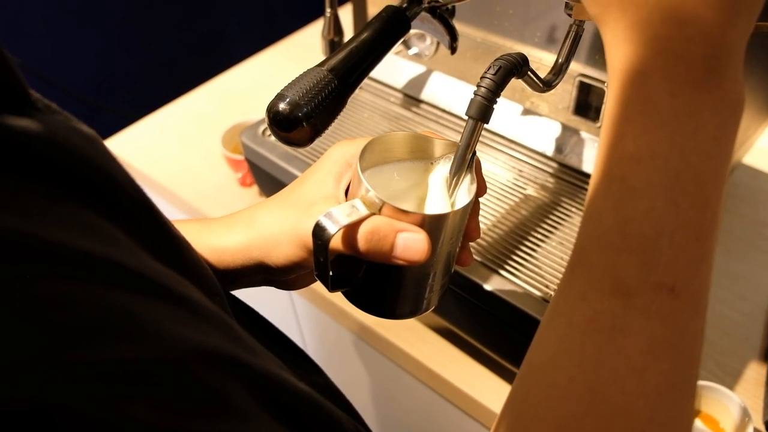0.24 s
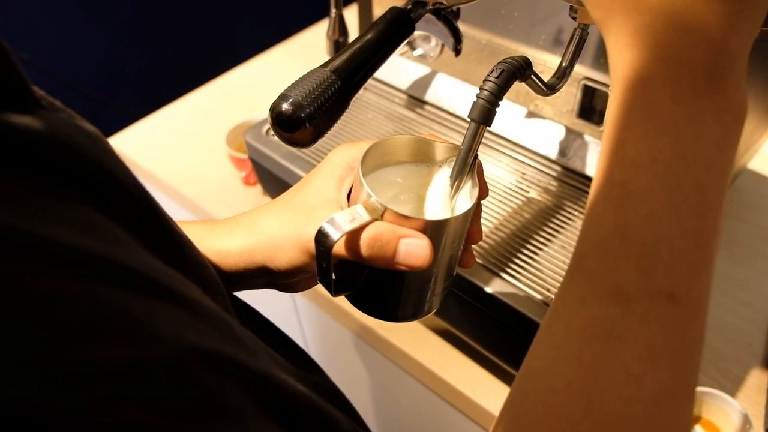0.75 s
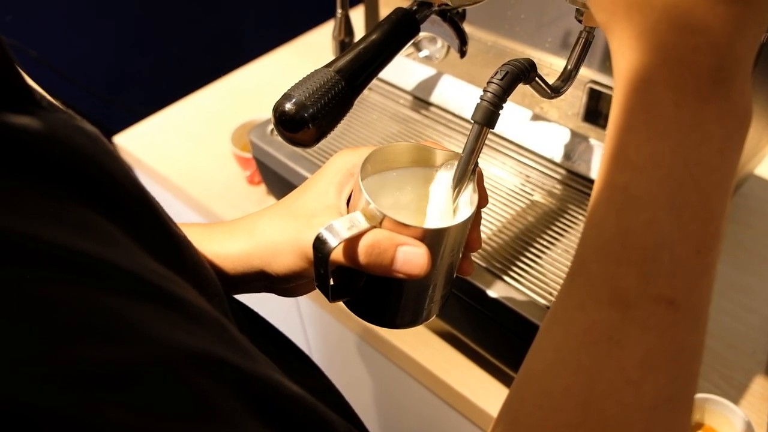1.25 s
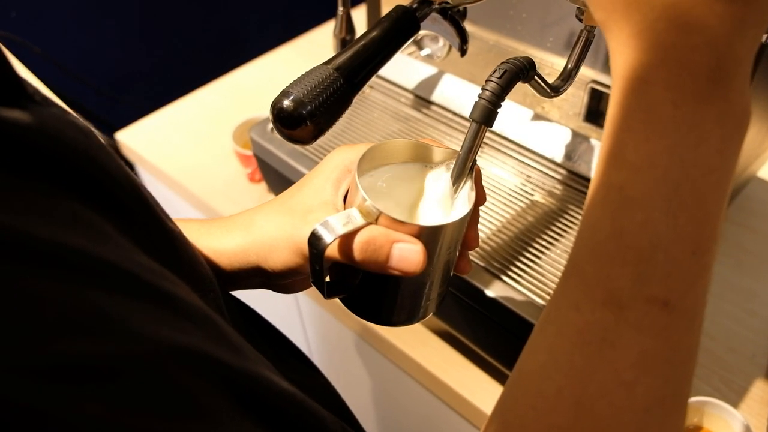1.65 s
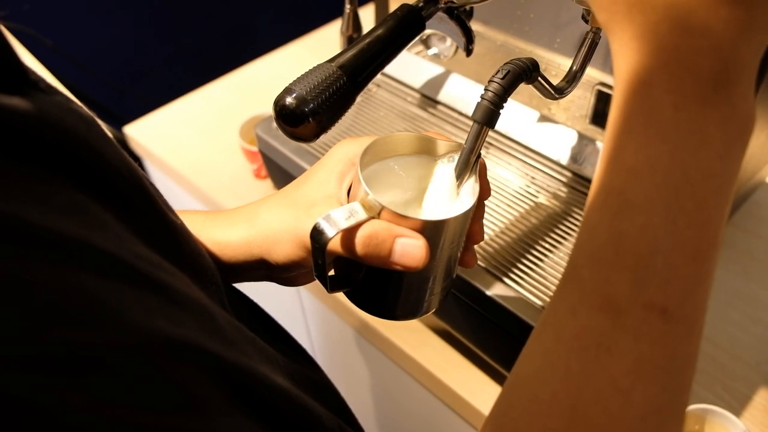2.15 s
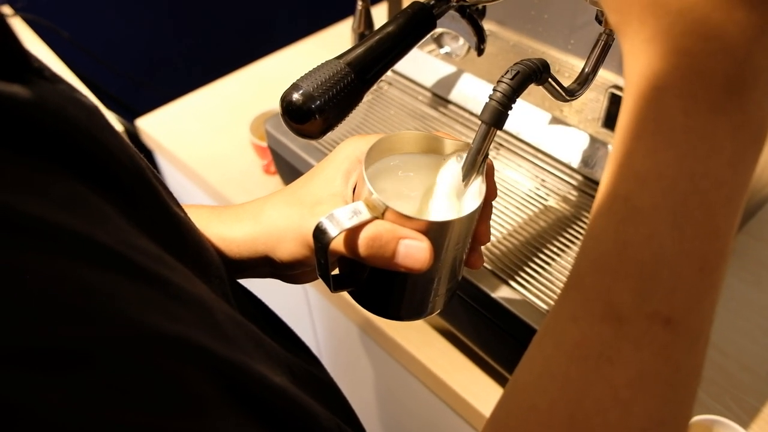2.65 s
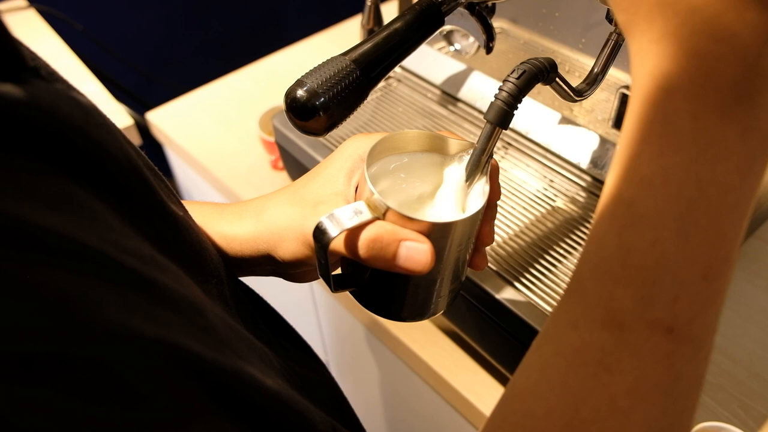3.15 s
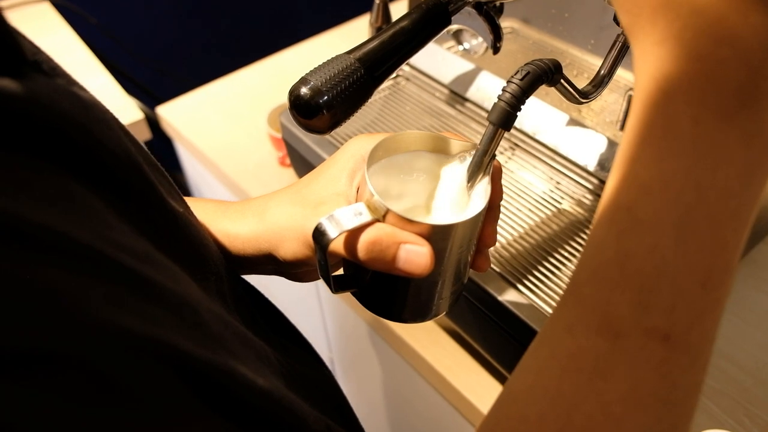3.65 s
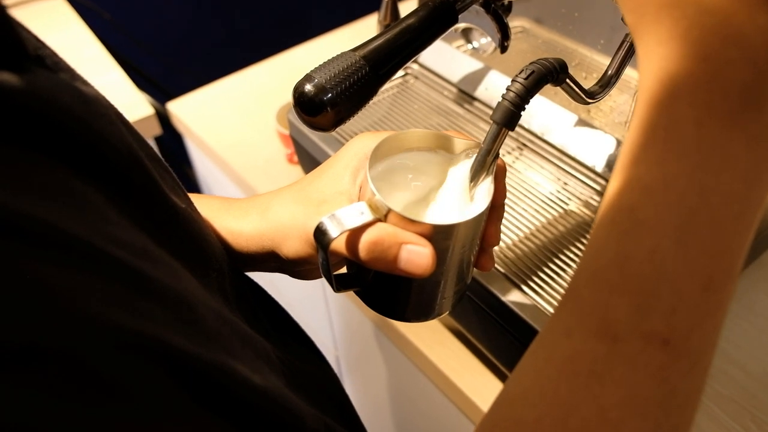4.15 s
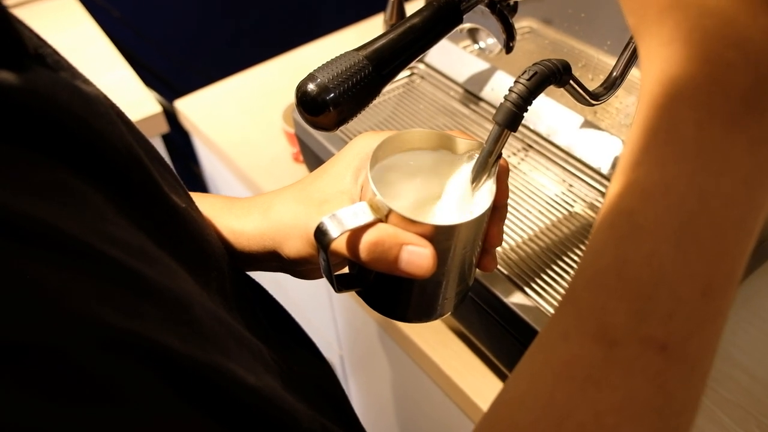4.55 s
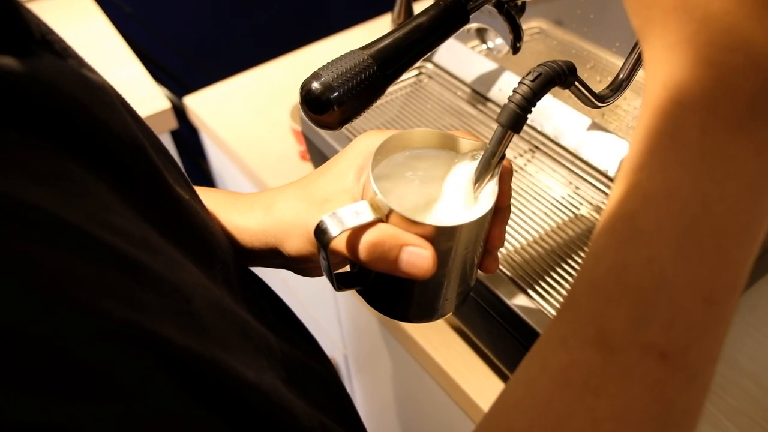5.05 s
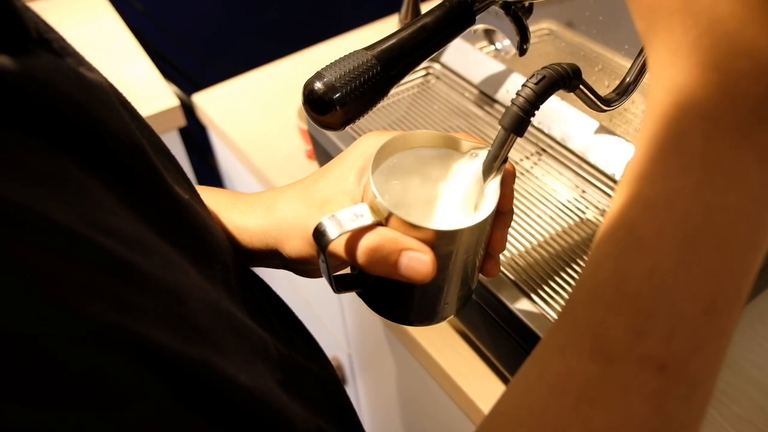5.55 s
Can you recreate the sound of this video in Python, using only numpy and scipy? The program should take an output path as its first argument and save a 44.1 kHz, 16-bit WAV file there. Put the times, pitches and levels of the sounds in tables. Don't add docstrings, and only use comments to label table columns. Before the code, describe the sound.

A steam jet spits and slurps at the surface of milk, gulps under, then roars steadily with a metallic ring that thickens toward the end.

```python
import sys
import numpy as np
from scipy import signal
from scipy.fft import rfft, irfft
from scipy.io import wavfile
from scipy.ndimage import uniform_filter1d

SR = 44100
rng = np.random.default_rng(int(sys.argv[2]) if len(sys.argv) > 2 else 0)


def dump_mix(stems):
    frames = np.atleast_2d(stems).T
    limited = np.clip(frames, -1, 1)
    pcm = np.round(limited * 32767).astype(np.int16)
    wavfile.write(sys.argv[1], SR, pcm)


def magnitude_from_level(level_db):
    exponent = np.asarray(level_db, float) / 20
    return 10 ** exponent


N = 255780


def evened(x):
    return x / np.sqrt(np.mean(x ** 2) + 1e-20)


def read(points, hz):
    f, value = np.transpose(points)
    return np.interp(np.log(hz + 1), np.log(f + 1), value)


def lifts(modes, hz):
    return sum(db / (1 + (2 * (hz - f) / width) ** 2) for f, width, db in modes)


def window(hz, low_hz, high_hz, order=30):
    return 1 / (1 + (low_hz / (hz + 1)) ** order) / (1 + (hz / high_hz) ** order)


def add(mix, s, sound):
    part = mix[round(max(s, 0) * SR):][:len(sound)]
    part += sound[:len(part)]


def crackle(per_s, spread_db, share):
    happens = rng.random(N) < per_s / SR
    size = magnitude_from_level(spread_db * np.minimum(rng.exponential(1, N), 3)) * happens
    collapses = evened(size * rng.choice([-1., 1.], N))
    share = np.clip(share, 0, 1)
    return np.sqrt(share) * collapses + np.sqrt(1 - share) * rng.standard_normal(N)


def shaped(drive, field_db, size, patchy_db, flicker_db):
    hz, t, z = signal.stft(drive, SR, nperseg=size, noverlap=size * 3 // 4)
    patches = rng.standard_normal(z.shape[::-1]).T
    patches = uniform_filter1d(patches, size=size // 100, axis=0)
    patches = evened(uniform_filter1d(patches, size=9, axis=1))
    flicker = evened(uniform_filter1d(rng.standard_normal(len(t)), size=4))
    z = z * magnitude_from_level(field_db(hz[:, None], t) + patchy_db * patches + flicker_db * flicker)
    return signal.istft(z, nperseg=size, noverlap=size * 3 // 4)[1][:N]


def glides(rows, waver, waver_s):
    out = np.zeros(N)
    for start_s, end_s, start_hz, end_hz, db in rows:
        count = round(max(end_s - start_s, .005) * SR)
        noise = rng.standard_normal((2, SR))
        drift, swell = (evened(uniform_filter1d(v, round(waver_s * SR))) for v in noise)
        hz = np.linspace(start_hz, end_hz, count) * (1 + waver * drift[:count])
        phase = 2 * np.pi * np.cumsum(hz) / SR
        tone = np.sqrt(2) * np.sin(phase) * magnitude_from_level(db + 1.9 * swell[:count])
        add(out, start_s, tone * signal.windows.tukey(count, .4))
    return out


# t/s, steam power level/dB, depth of the tip/0-1
JET_COURSE = [(0, -24.5, 0.09), (.29, -26, 0), (.58, -25.5, 0.1), (.87, -25.5, 0.07), (1.03, -21, 0.45),
              (1.35, -23, 0.09), (1.9, -23.3, 0.52), (2.3, -22, 0.68), (2.6, -23.5, 0.68), (3.05, -22, 0.7),
              (3.45, -21.5, 0.91), (3.62, -19, 1), (3.91, -21.5, 0.78), (4.1, -19.5, 0.79),
              (4.5, -18, 0.69), (5.07, -17.5, 0.57), (5.3, -18, 0.41), (5.8, -17.5, 0.18)]


def jet_at(t):
    s, power_db, depth = np.transpose(JET_COURSE)
    return np.interp(t, s, power_db), np.interp(t, s, depth)


def answer(parts, hz, t):
    power_db, depth = jet_at(t)
    controls = [c - c.mean() for c in (power_db, depth, t)]
    return sum(window(hz, low_hz, high_hz) * np.dot(laws, controls) for low_hz, high_hz, *laws in parts)


# f/Hz, reverberation time/s
ROOM_DECAY = [(400, 0.99), (2000, 0.44), (5000, 0.46), (10000, 0.33), (15000, 0.28)]


def room(x):
    taps = np.zeros((3, SR // 2))
    starts = np.arange(150, SR // 2 - 12, 12)
    at = starts + rng.integers(0, 12, (3, len(starts)))
    np.put_along_axis(taps, at, rng.choice([-1., 1.], at.shape), 1)
    hz, t, z = signal.stft(taps, SR, nperseg=256)
    decay = magnitude_from_level(-60 * t / read(ROOM_DECAY, hz)[:, None])
    tails = signal.istft(z * decay, SR, nperseg=256)[1]
    cycles = .7 * np.arange(N) / SR + np.arange(3)[:, None] / 3
    turns = np.cos(2 * np.pi * cycles) * np.sqrt(2 / 3)
    return signal.fftconvolve(x * turns, tails / np.linalg.norm(tails[0]), axes=1)[:, :N].sum(0)


# f/Hz, level/dB per Hz
RUMBLE_SPECTRUM = [(8.8, -31.5), (15, -5), (38, 5.5), (86, 1.5), (125, -1.5), (231, -6.5), (266, -15.5),
                   (329, -12), (390, -17), (450, -13.5), (580, -32), (990, -120)]


def rumble():
    low = shaped(rng.standard_normal(N), lambda hz, t: read(RUMBLE_SPECTRUM, hz) + 0 * t,
                 size=4096, patchy_db=.3, flicker_db=.2)
    return magnitude_from_level(-36.5) * evened(low)


# f/Hz, width/Hz, level/dB
MAINS_HUM = (99, 3, -43)


def hum():
    hz, width, db = MAINS_HUM
    r = np.exp(-np.pi * width / SR)
    waver = evened(signal.lfilter([1], [1, -r], rng.standard_normal(N)))
    return magnitude_from_level(db) * (1 + .5 * waver) * np.sin(2 * np.pi * hz * np.arange(N) / SR)


def ducking():
    power_db, _ = jet_at(np.arange(N) / SR)
    loud_db = uniform_filter1d(power_db, size=SR // 2)
    knee_db, share = -22.5, 0.7
    return magnitude_from_level(-share * np.maximum(loud_db - knee_db, 0))


# start t/s, end t/s, start f/Hz, end f/Hz, level/dB
ENGINE_GLIDES = [(.12, .46, 240, 230, -47.5), (.72, 1.3, 162, 177, -43), (.85, 1.08, 340, 310, -49.5),
                 (1.75, 2.3, 233, 238, -49), (2.95, 3.75, 310, 334.7, -53.5), (3.4, 4.1, 217, 231, -50.5),
                 (.8, 1.3, 224, 290, -53), (2.5, 3.4, 238, 247, -53), (1.3, 2.3, 130, 170, -50.5),
                 (2.0, 2.67, 170, 160, -52)]


def engines():
    return glides(ENGINE_GLIDES, waver=0.0078, waver_s=0.099)


# t/s, peak level/dB, f/Hz
KNOCKS = [
    (2.94, -25, 70),
    (3.023, -18, 65),
    (3.121, -24, 69.6),
    (3.182, -21, 49.6),
    (3.83, -20, 75),
    (.33, -30, 55),
]


def thumps():
    out, t = np.zeros(N), np.arange(5000) / SR
    for s, db, hz in KNOCKS:
        swell = (t / 0.015) * np.exp(1 - t / 0.0073)
        add(out, s, -magnitude_from_level(db) * np.sin(2 * np.pi * hz * t) * swell)
    return out


# t/s, peak level/dB, f/Hz
VALVE_TICKS = [
    (4.585, -36, 10900),
    (4.616, -54, 11700),
]


def ticks():
    out, t = np.zeros(N), np.arange(400) / SR
    for s, db, hz in VALVE_TICKS:
        rings = sum(np.sin(2 * np.pi * hz * k * t) for k in (.93, 1, 1.08, 1.3))
        add(out, s, magnitude_from_level(db - 60 * t / .008) * rings / 2)
    return out


# start t/s, end t/s, start f/Hz, end f/Hz, level/dB
VALVE_SQUEAKS = [(4.775, 4.795, 14200, 15200, -73), (4.8, 4.83, 13700, 14700, -82),
                 (4.803, 4.82, 14300, 14800, -61), (4.812, 4.84, 12850, 13500, -61),
                 (4.955, 4.99, 13100, 11950, -62), (4.99, 5.07, 12200, 11100, -60),
                 (4.975, 5.03, 15150, 14150, -60), (5.03, 5.055, 14600, 13900, -67),
                 (5.05, 5.095, 14150, 12900, -60)]


def squeaks():
    return glides(VALVE_SQUEAKS, waver=.004, waver_s=.004)


# t/s, level/dB, f/Hz, decay
# time to -60 dB/s
GULP_BUBBLES = [(1.556, -19, 830, 0.032), (1.557, -24.5, 580, 0.028), (1.6, -23, 1190, .03),
                (1.605, -20.5, 857, 0.047), (1.606, -24.5, 487, 0.052), (1.636, -20.5, 850, 0.03),
                (1.67, -38, 870, 0.035), (1.549, -15, 1800, .04), (1.699, -6.5, 1860, 0.052),
                (1.724, -11, 1850, 0.044), (2.522, -10.5, 1860, 0.035), (4.08, -6.5, 1875, .06),
                (4.946, -9, 1830, .04)]


def gulps():
    out, t = np.zeros(N), np.arange(6000) / SR
    for s, db, hz, t60 in GULP_BUBBLES:
        ring = np.sin(2 * np.pi * hz * t * (1 + 2.8 * t))
        add(out, s, magnitude_from_level(db - 60 * t / t60) * ring * np.minimum(t / 0.0018, 1))
    return out


# f/Hz, level/dB per Hz
TEAR_SPECTRUM = [(1760, -12), (3000, -4), (4180, -18.5), (4660, 5), (5060, -8), (5890, -6), (7400, -11.5),
                 (9680, -8), (10600, -14.5), (14300, -19), (15600, -36)]
# f/Hz, width/Hz, lift level/dB
MOUTH_MODES = [(3330, 170, -6), (3833, 250, 8.5), (4670, 200, 2), (5330, 120, 6.5), (5830, 340, 9.5),
               (6530, 130, 7.5), (9240, 250, -1), (9680, 510, 6), (11100, 250, 4), (12500, 500, 5),
               (13900, 550, 1)]
# t/s, length/s, body level/dB, brightness level/dB
AIR_DRAWS = [(0, 0.0083, -29.5, -19), (0.007, .02, -32, -13), (0.028, 0.014, -27.5, -10.5),
             (0.053, 0.048, -34, -26), (.109, .036, -30, -18), (0.143, 0.018, -20.5, -3),
             (0.165, 0.024, -22.5, -17), (0.197, 0.033, -25.5, -21), (0.222, 0.048, -27, -33),
             (.29, 0.57, -40, -20), (5.47, 0.035, -44, -16),
             (.893, 0.039, -36.5, -22), (.93, 0.027, -32.5, -16.5), (.971, 0.038, -31.5, -11.5),
                  (1.015, 0.023, -36.5, -17), (1.04, 0.029, -28, -15), (1.063, .011, -16, -15),
                  (1.073, 0.036, -23.5, -9), (1.11, 0.028, -19.5, -8.5), (1.142, .013, -21, -3.5),
                  (1.172, .024, -20.5, -5.5), (1.192, 0.021, -17.5, -9), (1.218, 0.015, -18, -7.5),
                  (1.236, .024, -18.5, -18), (1.27, 0.01, -16, -6.5), (1.284, 0.03, -19.5, -6),
                  (1.315, 0.011, -23.5, 2.5), (1.325, 0.028, -19, -9), (1.358, .014, -32, -2),
                  (1.393, 0.011, -23.5, -1.5), (1.427, 0.016, -21.5, -11.5), (1.438, 0.018, -22.5, -12),
                  (1.455, 0.017, -19, -10), (1.481, .014, -19, -6), (1.495, 0.016, -19, -6),
                  (1.514, 0.015, -19, -5.5), (1.534, 0.0092, -17.5, -17)]


def slurps():
    def field_db(hz, t):
        low_cut_db = 40 * window(hz, 1, 1500, order=8)
        return read(TEAR_SPECTRUM, hz) + lifts(MOUTH_MODES, hz) - low_cut_db + 0 * t

    drive = crackle(per_s=2500, spread_db=2.7, share=0.24)
    jet = rfft(shaped(drive, field_db, size=256, patchy_db=2.5, flicker_db=0.3))
    hz = np.fft.rfftfreq(N, 1 / SR)
    whistle = irfft(jet * window(hz, 8200, 10700), N)
    top = irfft(jet * window(hz, 10800, 30000), N)
    body = irfft(jet, N) - whistle - top
    power = np.zeros((3, N))
    for s, length, body_db, bright_db in AIR_DRAWS:
        levels = body_db, body_db + bright_db, body_db + 1.35 * bright_db - 1
        count = round(max(length, .003) * SR) + 260
        gate = signal.windows.tukey(count, min(520 / count, 1))
        for row, db in zip(power, levels):
            add(row, s - .003, magnitude_from_level(2 * db) * gate)
    sputter_per_s, sputter_db = 160, 2.2
    stutter = evened(uniform_filter1d(rng.standard_normal(N), size=SR // sputter_per_s))
    strength = np.sqrt(power) * magnitude_from_level(sputter_db * stutter - 1.0)
    return (strength * [evened(body), evened(whistle), evened(top)]).sum(0)


# f/Hz, level/dB per Hz
FIZZ_SPECTRUM = [(2200, -28), (3100, -9.5), (3600, -7), (4600, -7), (5150, -5.5), (5400, -11),
                 (6100, -11.5), (6550, -15), (7500, -17), (7700, -20.5), (10500, -26), (10850, -27.5),
                 (14400, -32), (15600, -36)]
# f/Hz, width/Hz, lift level/dB
RIM_MODES = [(3860, 170, 5), (4810, 170, 7.5), (5470, 70, 3), (6270, 190, 7.5), (7330, 200, 5.5),
             (8250, 200, 3), (9750, 350, 4.5), (10400, 250, 4)]
# low f/Hz, high f/Hz, share of power, level/dB at full depth, warming/dB per s
FIZZ_ANSWER = [(3100, 4060, 0.42, .3, 0.8), (3600, 5600, .05, 2, -0.82), (5040, 7500, .05, -4, -0.75),
               (8800, 20000, .05, -2, -.3)]
# middle t/s, half length/s, f/Hz, sink/Hz per s, width/Hz, lift level/dB
WHIRL_RING = (3.87, 0.94, 3970, 600, 400, 4.2)


def fizz():
    middle, half, ring_hz, sink_hz, width, lift_db = WHIRL_RING

    def field_db(hz, t):
        ring = lifts([(ring_hz - sink_hz * (t - middle), width, lift_db)], hz)
        whirl = ring * np.exp(-((t - middle) / half) ** 2)
        return read(FIZZ_SPECTRUM, hz) + lifts(RIM_MODES, hz) + answer(FIZZ_ANSWER, hz, t) + whirl

    drive = crackle(per_s=1500, spread_db=1.8, share=0.29)
    return magnitude_from_level(-38.5) * evened(shaped(drive, field_db, size=512, patchy_db=1.5, flicker_db=0.84))


# f/Hz, level/dB per Hz
ROAR_SPECTRUM = [(150, -57), (250, -28.5), (391, -32), (610, -19.5), (698, -26), (912, -13.5),
                 (1100, -19.5), (1330, -9), (1540, -8), (1840, 1), (1990, -0.5), (2180, -5.5),
                 (2600, -10.5), (3080, -23), (3600, -30.5), (4680, -54), (7920, -120)]
# f/Hz, width/Hz, lift level/dB
WALL_MODES = [(494, 68, 4), (617, 70, 1.5), (968, 140, -2.5), (1395, 44, -0.5), (1464, 36, 2.5),
              (1680, 33, 3.5), (1763, 68, 2.5), (1933, 24, 3.5), (2352, 97, 1.5)]
# low f/Hz, high f/Hz, share of power, level/dB at full depth, warming/dB per s
ROAR_ANSWER = [(100, 1130, 0.7, -2.5, 0.89), (1193, 1608, 0.7, -12.5, 1.84), (1555, 2200, 1.14, 2.3, -0.16),
               (2340, 6600, 0.77, -9.5, -1.5), (2760, 3300, .05, 0, 1.2)]


def roar():
    def field_db(hz, t):
        foam_start_s, foam_rise_s, foam_lift_db = 4.6, 0.76, 9.5
        thickness = np.clip((t - foam_start_s) / foam_rise_s, 0, 1)
        foam = foam_lift_db * thickness * window(hz, 2810, 2940)
        return read(ROAR_SPECTRUM, hz) + lifts(WALL_MODES, hz) + answer(ROAR_ANSWER, hz, t) + foam

    drive = crackle(per_s=2500, spread_db=3.1, share=0.44)
    return magnitude_from_level(-18.5) * evened(shaped(drive, field_db, size=1024, patchy_db=0.9, flicker_db=1.03))


def scene():
    background = (rumble() + hum()) * ducking()
    far = background + engines() + thumps()
    events = ticks() + squeaks() + gulps() + slurps()
    steam = fizz() + roar()
    reverberant = room(magnitude_from_level(-9.5) * steam + magnitude_from_level(-6.5) * events)
    return (steam + events + reverberant + far)[None]


def band_limit(x):
    return signal.sosfilt(signal.butter(12, 15720, fs=SR, output="sos"), x)


def record(dry):
    ceiling = 1.15
    mix = ceiling * np.tanh(dry / ceiling)
    return band_limit(mix)


dry = scene()
out = record(dry)
dump_mix(out)
```